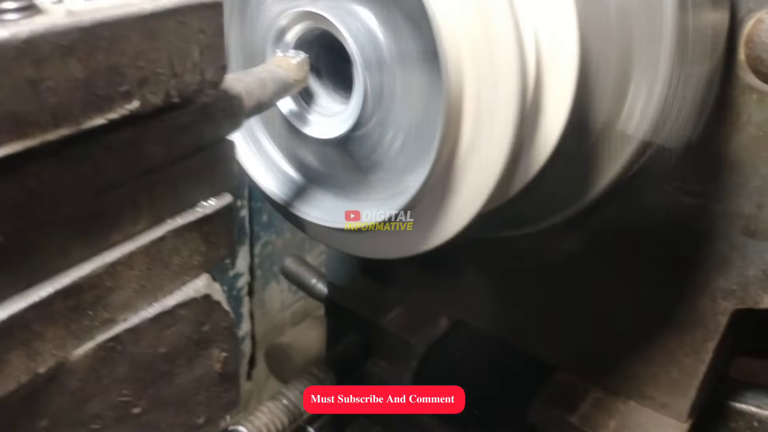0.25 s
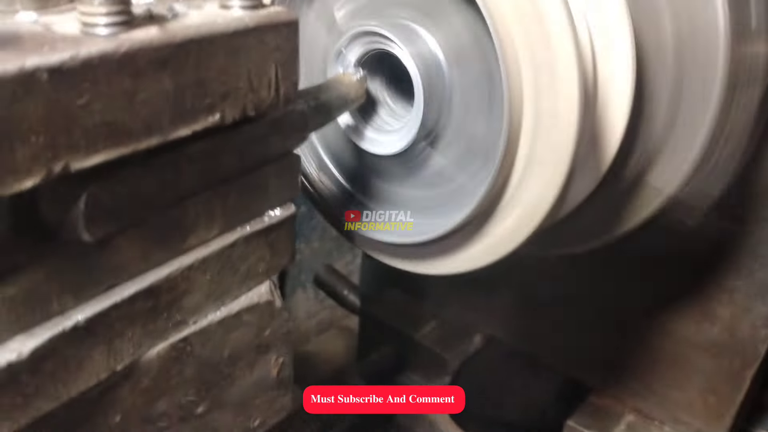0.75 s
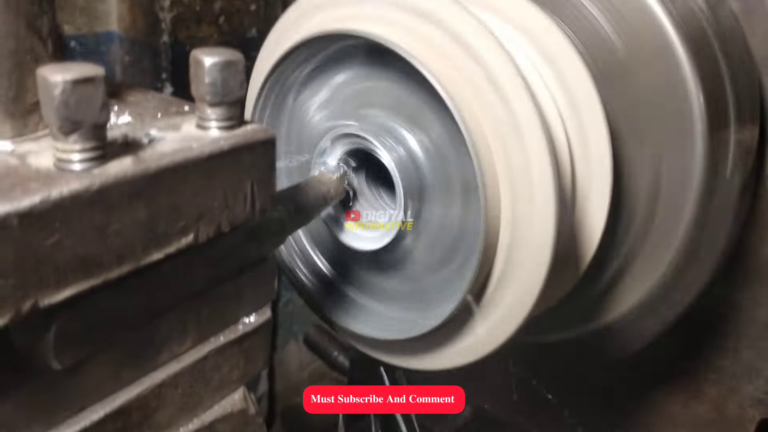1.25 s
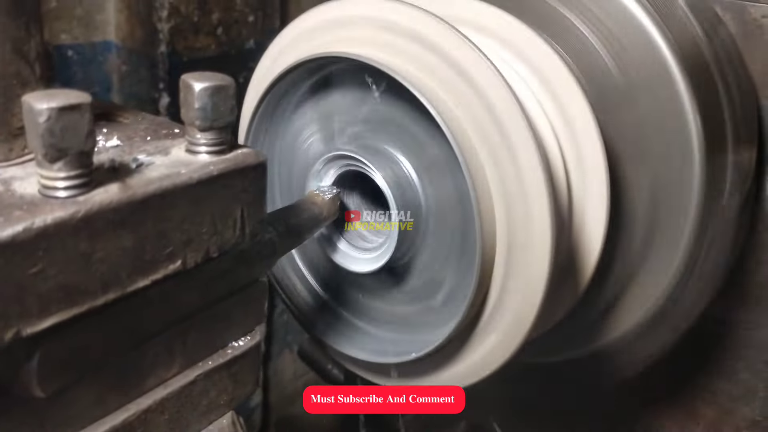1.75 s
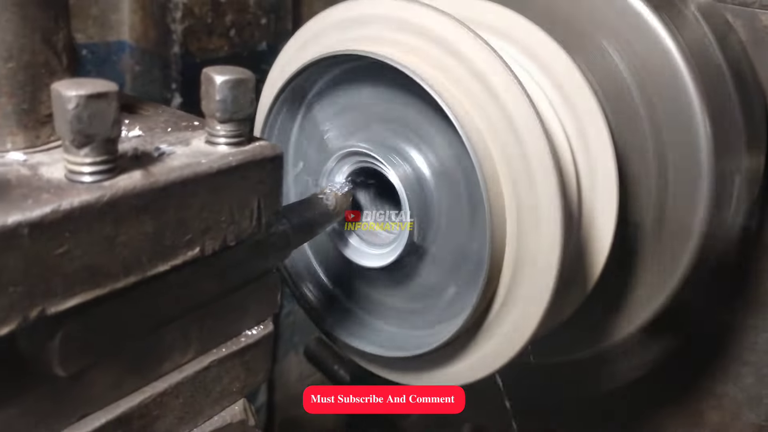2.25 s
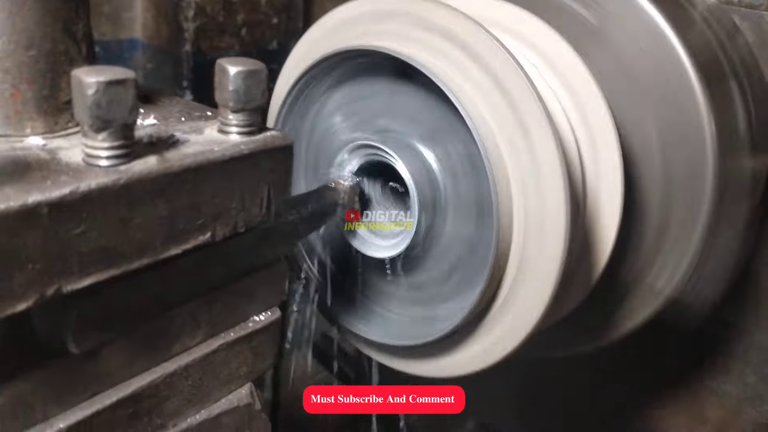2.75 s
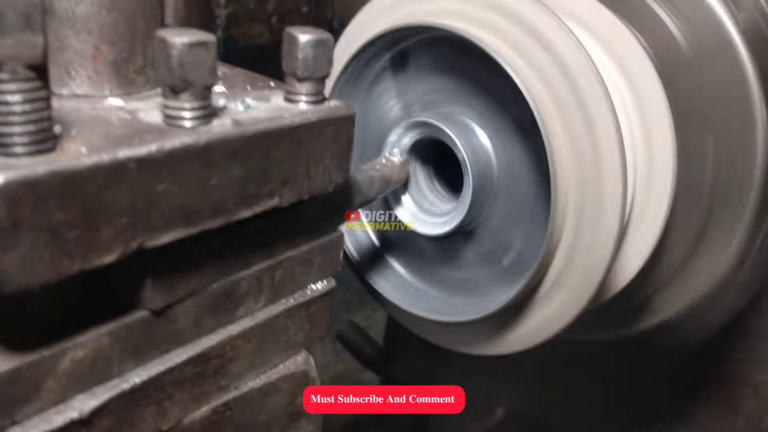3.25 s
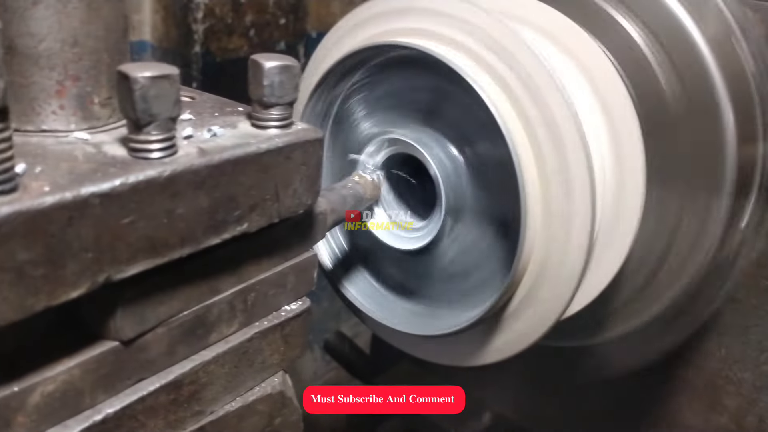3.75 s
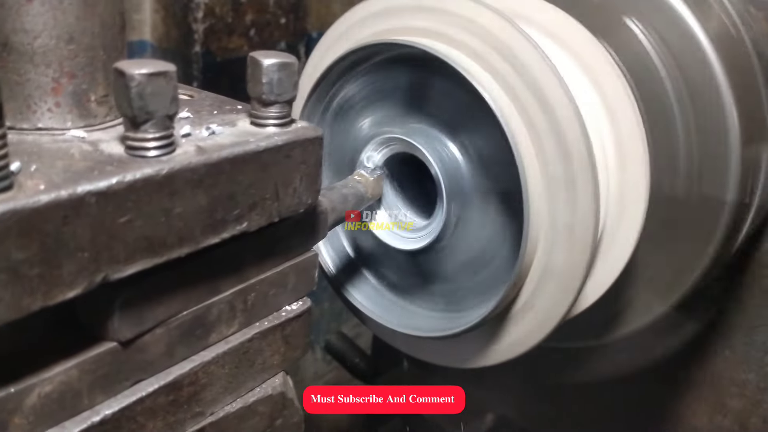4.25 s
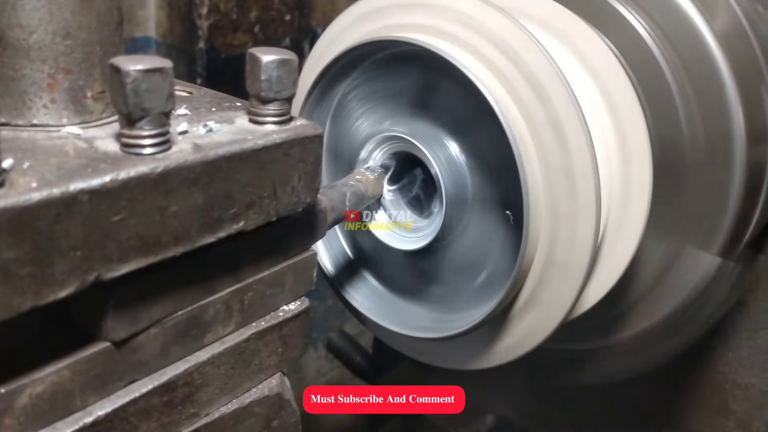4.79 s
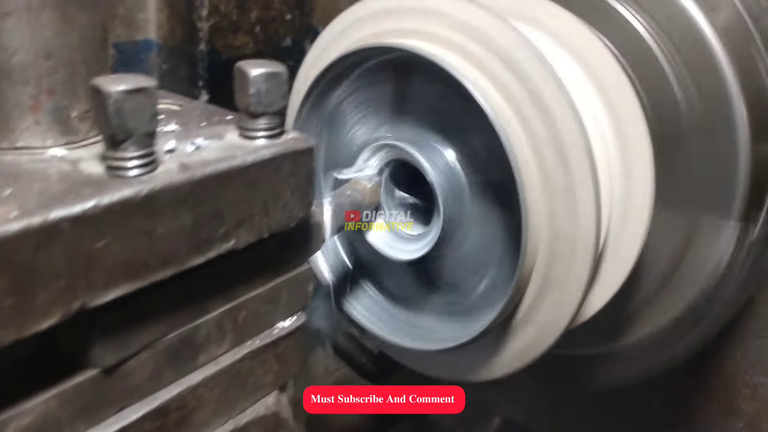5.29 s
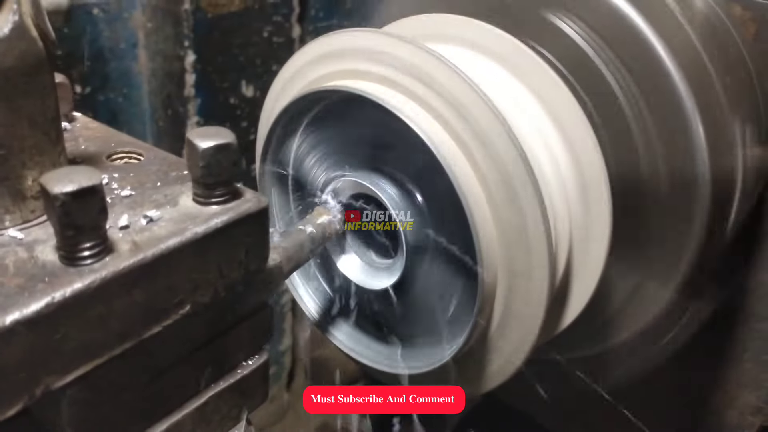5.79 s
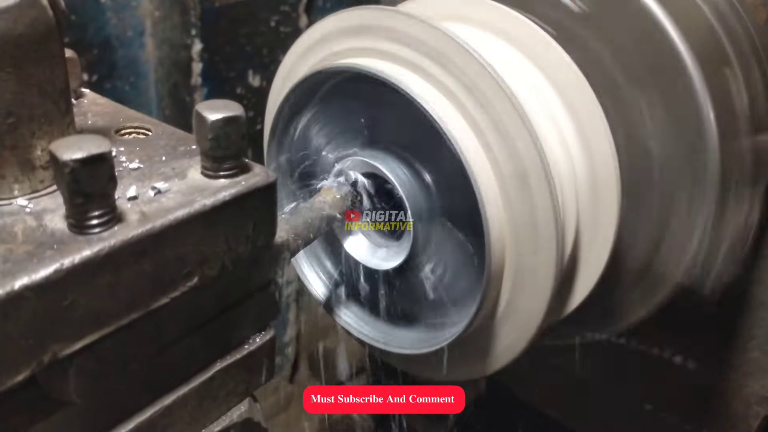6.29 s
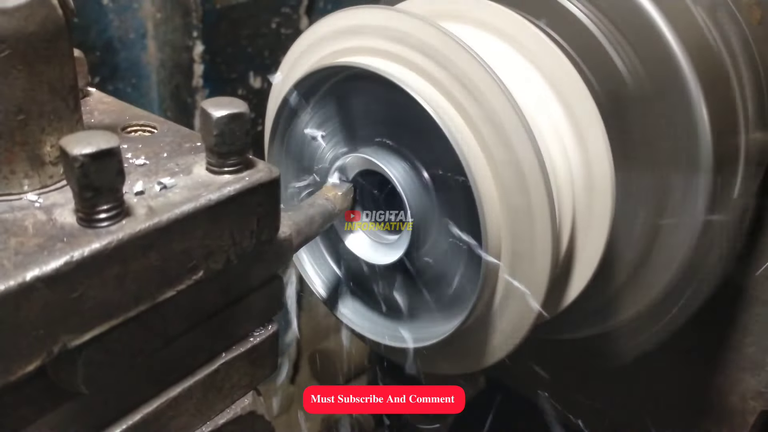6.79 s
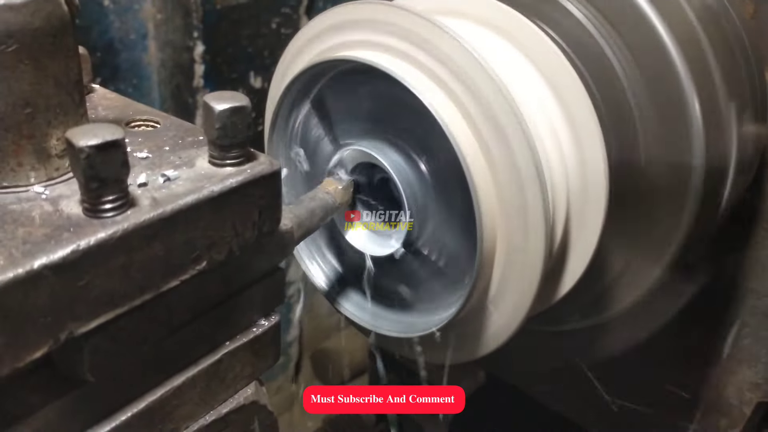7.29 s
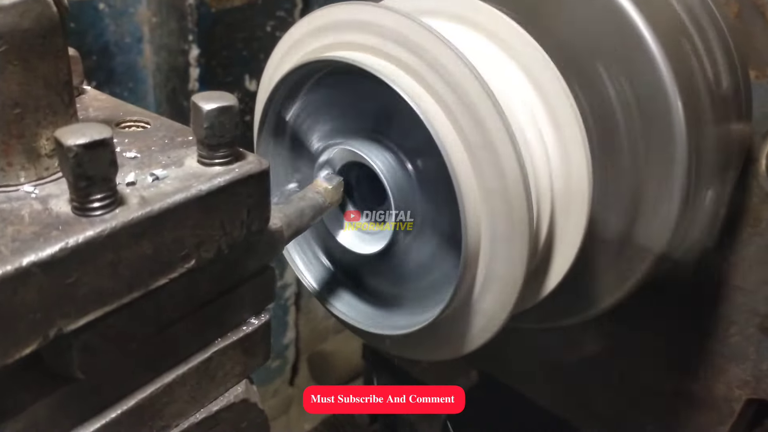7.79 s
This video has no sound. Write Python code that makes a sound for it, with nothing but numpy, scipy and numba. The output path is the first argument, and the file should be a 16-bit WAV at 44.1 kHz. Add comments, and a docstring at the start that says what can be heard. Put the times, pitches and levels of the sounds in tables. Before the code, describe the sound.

Close, dry machine clatter and low motor hum, two spells of metallic scraping, then a loud high chatter squeal, broken rhythmically, fading in pulses near the end.

```python
"""A lathe in a workshop: from the start its drive hums, rumbles and clanks, as motor sines and rung casing modes.
At 0.4 s the tool skips three times and scrapes until 2.5 s, as fluttering noise through resonances.
At 3.35 s it bites again, with a wandering ring and a fading whistle.
At 5.04 s the boring bar locks into a squeal, an unsteady tone with overtones that keeps breaking off.
The squeal ends by 7.8 s in a pulsing last ring. A limiter ducks the machine under the loudest tone."""
import sys
import numpy as np
from scipy import signal
from scipy.fft import rfft, irfft, next_fast_len
from scipy.io import wavfile
from scipy.ndimage import uniform_filter1d, minimum_filter1d, map_coordinates
from numba import njit

SR = 44100
rng = np.random.default_rng(int(sys.argv[2]) if len(sys.argv) > 2 else 0)


def boost(x):
    """Linear amplitude factor 10**(x/20) for a level x in decibels (scalar or array-like)."""
    u = np.asarray(x, float) / 20
    return 10 ** u


def wav_record(signal):
    """Record a signal, one row per channel, as 16-bit PCM in the file named by sys.argv[1]."""
    frames = np.transpose(np.atleast_2d(signal))
    bounded = np.clip(frames, -1, 1)
    # unit amplitude maps onto the largest positive 16-bit level
    quanta = np.round(bounded * 32767).astype(np.int16)
    wavfile.write(sys.argv[1], SR, quanta)


N = 354563
TIME = np.arange(N) / SR

# course of the squeal: start_s, mean_pitch_hz, level_db, overtones_db
SQUEAL_COURSE = [(5.038, 2740, -19.5, -63), (5.088, 2735, -1.9, -48.5), (5.431, 2767, -0.2, -45),
                 (5.599, 2724, -4, -51), (5.8, 2745, -5, -45), (5.999, 2716, -0.5, -34),
                 (6.119, 2677, -5, -44), (6.19, 2726, -4, -26), (6.3, 2746, 2.5, -33),
                 (6.5, 2734, 4, -27.5), (6.751, 2750, 1, -33), (7.1, 2737, 0.65, -31),
                 (7.301, 2753, 0, -39.5), (7.44, 2723, -5, -39), (7.51, 2716, -0.5, -38),
                 (7.609, 2784, -6.5, -51), (7.679, 2780, -22.5, -55), (7.8, 2760, -45, -66)]
# irregular breaks in the squeal: middle_s, depth_db, length_s
SQUEAL_BREAKS = [(5.11, 7, .012), (5.175, 18, .016), (5.225, 16, .014), (5.352, 18, .082),
                 (5.486, 12, .084), (5.61, 8, .012), (5.668, 12, .01), (5.728, 10, .016), (6.063, 12, .012),
                 (7.293, 14, .01), (7.413, 18, .016), (7.485, 14, .013), (7.555, 20, .018),
                 (7.63, 20, .014)]
# overtones of the slipping edge: multiple of the slip rate, level_db over the overtone course
SLIP_OVERTONES = [(2, 2), (3, -16.5), (4, -11.5), (5, -14)]
# how ragged the squeal is: start_s, roughness (0-1)
SQUEAL_ROUGHNESS = [(5.04, .3), (5.45, .3), (5.55, .5), (6.2, .7), (6.28, .32), (7.1, .42), (7.3, .5),
                    (7.68, .6)]
# rms of the cutting layers: start_s, post_db, holder_db, bar_db, chips_db
CUT_LEVELS = [(.41, -24, -20.5, -27.5, -51), (1.6, -27, -25.5, -26, -49), (2.2, -24.5, -24.5, -22, -45),
              (2.5, -28.5, -26.5, -28, -48), (3.39, -31, -23.5, -26.5, -49), (4, -23, -27.5, -22.5, -49.5),
              (4.75, -25, -23.5, -23, -51), (4.87, -23.5, -29.5, -20, -44.5),
              (5.15, -27.5, -33.5, -19.5, -42), (5.6, -32.5, -36, -17, -40.5),
              (6.3, -33.5, -51.5, -17, -40), (7.55, -49.5, -51, -21.5, -44), (7.7, -50, -47, -27.5, -47),
              (8.04, -52.5, -40, -34.5, -50.5)]
# the tool's two passes: touch_s, lift_s, ramp_s (time to bite or let go)
TOOL_PASSES = [(0.399, 2.53, 0.023), (3.354, 9, .06)]
# resonances of the tool post: pitch_hz, width_hz, level_db
POST_MODES = [(1827, 120, 0)]
# resonances of the tool holder: pitch_hz, width_hz, level_db
HOLDER_MODES = [(2353, 480, 0.8), (2460, 150, -3)]
# resonances of the rubbing boring bar: pitch_hz, width_hz, level_db
BAR_MODES = [(2682, 251, -1.5), (2849, 91, -3)]
# colour of the chip hiss: pitch_hz, width_hz, level_db
CHIP_MODES = [(3350, 1400, -15), (3685, 170, -1), (4580, 340, -17.5), (4900, 190, -14.5),
              (5320, 1600, -20.5), (6500, 270, -26), (7260, 450, -23)]
# colour of the rim hiss on top: pitch_hz, width_hz, level_db
RIM_MODES = [(8110, 250, -9), (9740, 250, -8), (10400, 300, -9), (11900, 500, -6), (12400, 300, -9),
             (13050, 250, -9), (14450, 500, -3), (15400, 400, -11)]
# whistle of the second pass: pitch_hz, width_hz, level_db
WHISTLE_MODES = [(4930, 170, 0)]
# the bar's last ring: pitch_hz, width_hz, level_db
LAST_RING_MODES = [(2875, 60, 0)]
# chips snapping in the treble: start_s, level_db (the burst starts 6 dB under it, rms)
CHIP_SNAPS = [(4.862, -28)]
# louder clanks of the drive: start_s, peak_db, thud_db (lift of the casing modes under 800 Hz)
LOUD_CLANKS = [(.233, -5.5, 2), (.511, -6.5, 3.5), (.65, -7.5, -4), (.793, -6, -6), (.928, -5, -8),
               (1.205, -3, -11), (1.254, -6, -3), (1.488, -8.5, -14), (1.765, -3.5, -2), (1.906, -2, 1),
               (2.045, -9, -8), (2.097, -5, -8), (2.186, -3, -3), (2.464, -7.5, -5), (2.607, -7.5, -3),
               (2.652, -5, -6), (2.883, -4, -2.5), (3.161, -2.5, -7), (3.272, -6.5, -5), (3.574, -6, -2),
               (3.646, -10, 0), (6.265, -6, -19), (6.686, -10, -6.5), (6.822, -5.5, -17),
               (7.102, -6.5, -21.5), (7.383, -4.5, -23), (7.529, -5, 1), (7.6, -11.5, 4), (7.665, -6, 3),
               (7.713, -5.5, 0), (7.805, -13, -14), (7.927, -10, -4), (7.991, -12, -9)]
# what a clank rings with: pitch_hz, level_db, t60_s
CASING_MODES = [(350, -2, .05), (560, 1, .06), (650, 0, .045), (975, 2, .035), (1045, 0, .04),
                (1240, 0, .04), (1600, 0, .025), (1815, 6, .04), (2350, -3, .03)]
# course of the headstock rumble above the bass: start_s, level_db
RUMBLE_COURSE = [(0, -24), (1.8, -22), (3.2, -24), (4.2, -25.5), (5, -27), (6.5, -26.5), (7.3, -25),
                 (7.7, -22.5), (8.04, -23.5)]
# colour of the headstock rumble: pitch_hz, level_db (per Hz)
RUMBLE_COLOUR = [(20, -11.5), (52, -26), (64, -7.5), (125, -5), (140, -13), (170, -3.5), (235, -15.5),
                 (340, -6), (400, -13), (550, -8), (1450, -9), (2420, -15), (3090, -35.5), (5300, -53),
                 (8130, -76.5), (15500, -71.5)]
# motor lines: pitch_hz, level_db (rms before the throb), throb_depth (0-1)
MOTOR_LINES = [(71.8, -36, 0.5), (102.6, -38.5, 0.06), (104, -42.5, 0.03), (112.8, -48.5, 0),
               (157, -44.5, 0)]

# one turn of the spindle, and a moment when a turn begins
TURN_S, TURN_AT_S = .2785, 6.227
# the skipping edge: first skip, spacing, depth and length of a skip
SKIP_AT_S, SKIP_EVERY_S, SKIP_DB, SKIP_S = .43, .035, 18, .009


def unit(x):
    """Scales a signal to rms 1."""
    return x / np.sqrt(np.mean(np.abs(x) ** 2) + 1e-20)


def curves(rows):
    """Draws each column after the time as a curve, one value per sample."""
    s, *columns = np.transpose(rows)
    return [np.interp(TIME, s, column) for column in columns]


def wobble(rate):
    """Draws a smooth random curve of rms 1, rate knots a second."""
    knots = rng.standard_normal(int(N * rate / SR) + 4)
    return unit(map_coordinates(knots, [TIME * rate]))


def filtered(x, response):
    """Multiplies the spectrum of x by a response of frequency."""
    size = next_fast_len(N + 8192)
    return irfft(rfft(x, size) * response(np.fft.rfftfreq(size, 1 / SR)), size)[:N]


def scraped(modes, flutter_db, rate):
    """Uneven scraping: fluttering noise heard through steep resonances, rms 1."""
    def gain(f):
        power = sum(boost(db) ** 2 / (1 + (2 * (f - hz) / width) ** 2) ** 2.11 for hz, width, db in modes)
        return np.sqrt(power)
    scrape = rng.standard_normal(N) * boost(flutter_db * wobble(rate))
    return unit(filtered(scrape, gain))


def dips_db(rows):
    """Sums dips in dB; short ones sink in slowly and end abruptly, long ones have a flat bottom."""
    def dip(s, length):
        if length > .05:
            return np.exp(-(2 * (TIME - s) / length) ** 8)
        stretch = np.where(TIME < s, 2.2, 1)  # the way down takes longer than the way back
        return np.exp(-np.abs(2 * (TIME - s) / (length * stretch)) ** 2.5)
    return sum(depth * dip(s, length) for s, depth, length in rows)


def squeal():
    """The bar locks into self-excited chatter: one tone that wavers, beats and breaks off."""
    mean_hz, level_db, overtones_db = curves(SQUEAL_COURSE)
    roughness, = curves(SQUEAL_ROUGHNESS)
    break_db = dips_db(chatter_breaks())

    # the pitch climbs 38 Hz through each turn and falls back in its last 14 percent
    turns = (TIME - TURN_AT_S) / TURN_S
    climb = np.interp(turns % 1, [0, 1 - .14, 1], [-.5, .5, -.5])
    scallop_hz = -5 * np.cos(4 * np.pi * turns)  # a smaller rise and fall each half turn
    slip_hz = mean_hz + 38 * climb + scallop_hz
    ring_hz = slip_hz - 6 * np.clip(level_db, -12, 0)  # a weaker ring lies higher, 6 Hz per dB

    def fading(share, rate):
        """A steady part plus a random part, in size and phase; share is the random power."""
        random = wobble(rate) + 1j * wobble(rate)
        return np.sqrt(1 - share) + np.sqrt(share / 2) * random

    def unsteady_phase(hz):
        """Phase of a cycle that wavers by 6 Hz rms."""
        return 2 * np.pi * np.cumsum(hz + 6 * wobble(60)) / SR

    bar_ring = fading(roughness ** 2, rate=130) * np.exp(1j * unsteady_phase(ring_hz))
    tone = boost(level_db - break_db) * bar_ring

    # the edge slips with a waver of its own; higher overtones blur faster
    slip_phase = unsteady_phase(slip_hz)
    # harshest where the pitch is lowest; a break takes only a fifth of its dB from the overtones
    harsh_db = overtones_db - 5 * climb - 0.2 * break_db + 2.0 * wobble(12)
    for k, db in SLIP_OVERTONES:
        tone += boost(db + harsh_db) * fading(.8, rate=60 * k) * np.exp(1j * k * slip_phase)

    start_s, end_s = SQUEAL_COURSE[0][0], SQUEAL_COURSE[-1][0]
    on = np.clip(np.minimum(TIME - start_s, end_s - TIME) / .01, 0, 1)
    return on * np.sqrt(2) * tone.real


def chatter_breaks():
    """Adds to the irregular breaks those of the settled chatter: deep each turn, shallower halfway."""
    settled_s, unsettled_s = 6.2, 7.25
    turn_db, half_db, length_s = 18, 10, .014
    to_turn_s = (TURN_AT_S - settled_s) % TURN_S
    half_turns = np.arange(settled_s, unsettled_s, TURN_S / 2) + to_turn_s
    regular = [(s, half_db if k % 2 else turn_db, length_s) for k, s in enumerate(half_turns)]
    return SQUEAL_BREAKS + regular


def cut():
    """The edge scrapes the bore and shakes post, holder and bar; chips and rim hiss above."""
    post_db, holder_db, bar_db, chips_db = curves(CUT_LEVELS)
    rim_db = -63 + 1.9 * (chips_db + 48.5)  # the rim hiss swings wider than the chip hiss

    body = boost(post_db) * scraped(POST_MODES, flutter_db=3.0, rate=18)
    body += boost(holder_db) * scraped(HOLDER_MODES, flutter_db=0.5, rate=22)
    body += boost(bar_db) * scraped(BAR_MODES, flutter_db=1.84, rate=22)
    hiss = boost(chips_db) * scraped(CHIP_MODES, flutter_db=1.5, rate=21)
    hiss += boost(rim_db) * scraped(RIM_MODES, flutter_db=1.6, rate=35)

    touch = sum(np.clip(np.minimum(TIME - on, off - TIME) / ramp + .5, 0, 1) for on, off, ramp in TOOL_PASSES)
    lifted_db = -12.5 * (1 - touch)  # the lifted tool still shakes
    # the edge skips three times as it first touches
    skips = [(SKIP_AT_S + k * SKIP_EVERY_S, SKIP_DB, SKIP_S) for k in range(3)]
    return boost(lifted_db - dips_db(skips)) * (body + hiss + edge())


def edge():
    """From the second bite to the squeal, a wandering ring in the bar's rub and a fading whistle."""
    bar_db = curves(CUT_LEVELS)[2]
    since = TIME - TOOL_PASSES[1][0]
    ring_hz = 2630 + 30 * wobble(14) + 50 * wobble(150)
    ring = np.sqrt(2) * np.sin(2 * np.pi * np.cumsum(ring_hz) / SR)
    ring *= boost(bar_db - 5 + 3.8 * wobble(25))  # lies 5 dB under the rub
    # -55 dB as the pass bites, fading 10 dB a second
    whistle = boost(-55 - 10 * since) * scraped(WHISTLE_MODES, flutter_db=2.2, rate=23)
    on = np.clip(np.minimum(since, SQUEAL_COURSE[0][0] - TIME) / .03, 0, 1)
    return (ring + whistle) * on


def last_ring():
    """As the squeal dies the edge skips again, and the bar rings on in pulses that fade 22 dB a second."""
    since = TIME - 7.665
    pulses = np.sin(np.pi * since / SKIP_EVERY_S) ** 2 * (since > 0)
    fade = boost(-22 - 22 * np.maximum(since, 0))
    return fade * pulses * scraped(LAST_RING_MODES, flutter_db=2.5, rate=15)


def chip_snaps():
    """A snapping chip is a burst of treble noise that dies by 60 dB in 30 ms."""
    burst = sum(boost(db - 60 * np.maximum(TIME - s, 0) / .03) * (TIME > s) for s, db in CHIP_SNAPS)
    treble = filtered(rng.standard_normal(N), lambda f: (f > 3200) / (1 + (f / 6000) ** 2))
    return burst * unit(treble) / 2


def clanks():
    """Each clank is a hard contact and a ragged rattle that ring the casing at new strengths."""
    out, t = np.zeros(N + SR), TIME[:SR // 6]
    hz, db, t60 = np.transpose(CASING_MODES)[:, :, None]
    body_band = signal.butter(6, [230, 2750], "bandpass", fs=SR, output="sos")
    crack_band = signal.butter(3, [2750, 4800], "bandpass", fs=SR, output="sos")
    for s, peak_db, thud_db in beat():
        level_db = db + 2.5 * rng.standard_normal(hz.shape) + thud_db * (hz < 800)
        ring = (boost(level_db - 60 * t / t60) * np.sin(2 * np.pi * hz * t)).sum(0)
        ring[0] = 14  # the dry contact itself
        strike = boost(-60 * t / .022) + boost(-12 - 60 * t / .22)  # a short hit and a longer, weaker rattle
        rattle = strike * rng.laplace(size=len(t))
        blow = signal.fftconvolve(rattle, ring)[:len(t)]
        blow = signal.sosfilt(body_band, blow) + boost(-22) * signal.sosfilt(crack_band, blow)
        out[round(s * SR):][:len(t)] += boost(peak_db) * blow / np.abs(blow).max()
    return out[:N]


def beat():
    """Lists the loud clanks, and soft ones on the half turns left free."""
    every_s, soft_db, scatter_db, soft_thud_db = .1401, -16, 2.5, -10
    loud_s = np.transpose(LOUD_CLANKS)[0]
    half_turns = np.arange(loud_s[0] % every_s, TIME[-1], every_s)
    peaks_db = soft_db + scatter_db * rng.standard_normal(len(half_turns))
    soft = [(s, db, soft_thud_db) for s, db in zip(half_turns, peaks_db)
            if np.abs(loud_s - s).min() > every_s / 4]
    return LOUD_CLANKS + soft


def headstock():
    """Gears and belt rumble as coloured noise, uneven above a steady bass."""
    hz, db = np.transpose(RUMBLE_COLOUR)
    noise = filtered(rng.standard_normal(N), lambda f: boost(np.interp(np.log(f + 1), np.log(hz), db)))
    noise = unit(noise)
    bass = filtered(noise, lambda f: 1 / (1 + (f / 230) ** 6))
    level_db, = curves(RUMBLE_COURSE)
    gears = (noise - bass) * boost(level_db + 2.35 * wobble(35) + 1.2 * wobble(90))
    return gears + boost(-24.0) * bass


def motor_hum():
    """The motor hums in steady sines of slowly drifting level; the lowest throbs most."""
    throb_hz, throb_peak_s = 3.41, .273
    throb = np.cos(2 * np.pi * throb_hz * (TIME - throb_peak_s))
    hum = np.zeros(N)
    for hz, db, depth in MOTOR_LINES:
        level = np.sqrt(2) * boost(db + 0.72 * wobble(1.1)) * (1 + depth * throb)
        hum += level * np.sin(2 * np.pi * hz * TIME)
    return hum


def scene():
    """All sources stand at one spot before the microphone."""
    tool = squeal() + cut() + last_ring() + chip_snaps()
    drive = clanks() + headstock() + motor_hum()
    return (tool + drive)[None]


@njit
def recovered(need, step):
    """Lets the gain drop at once and creep back."""
    out = need.copy()
    for i in range(1, len(out)):
        out[i] = min(need[i], out[i - 1] + step * (1 - out[i - 1]))
    return out


def band_limit(x):
    """A steep low-pass at the top of the band."""
    return signal.sosfilt(signal.butter(12, 15920, fs=SR, output="sos"), x)


def record(dry):
    """A limiter looks a little ahead, pulls peaks under the ceiling, holds and recovers."""
    ceiling, release_s = .98, .06
    sound = filtered(dry[0], lambda f: f < 15550)  # nothing above 15550 Hz
    need = np.minimum(1, ceiling / (np.abs(sound) + 1e-9))
    held = minimum_filter1d(need, size=1200, origin=480)  # sees about 3 ms ahead, holds about 24 ms
    gain = uniform_filter1d(recovered(held, 1 / (release_s * SR)), size=200)
    limited = (sound * gain)[None]
    return band_limit(limited)


dry = scene()
out = record(dry)
wav_record(out)
```